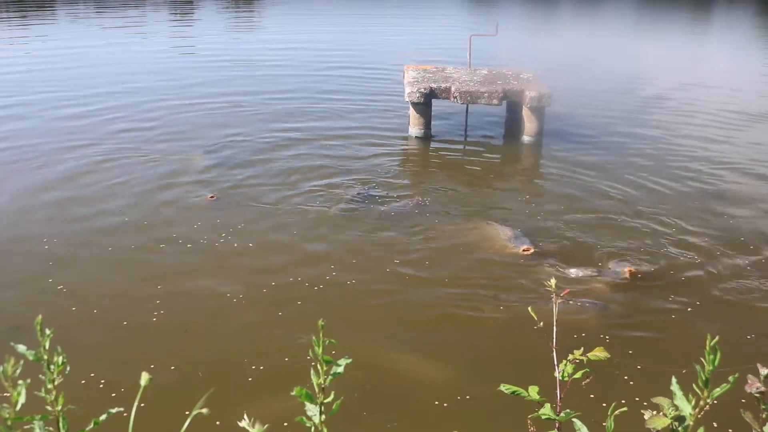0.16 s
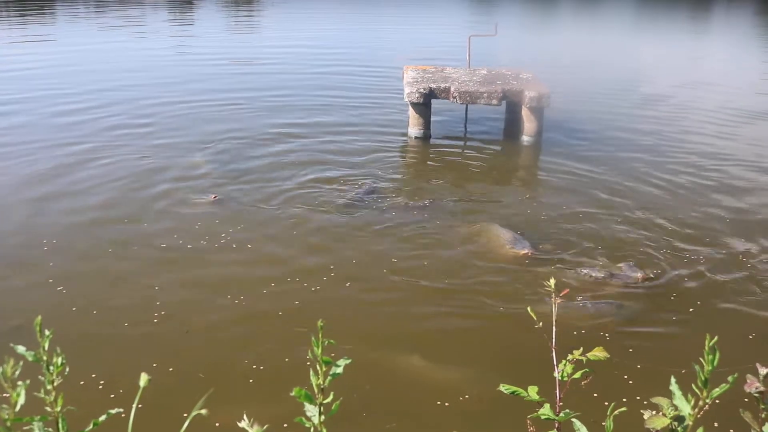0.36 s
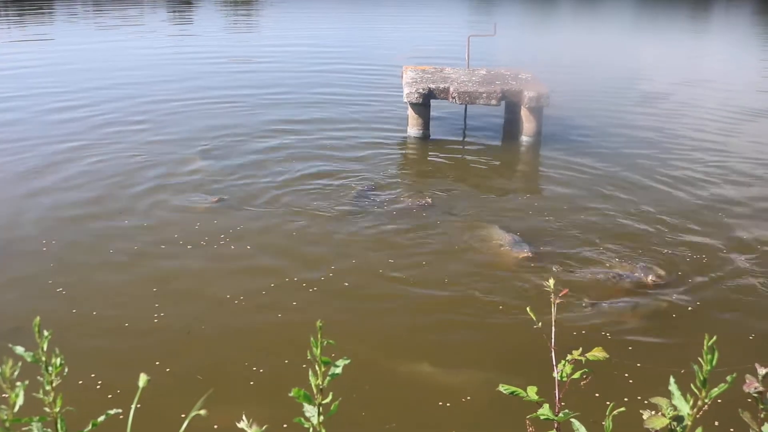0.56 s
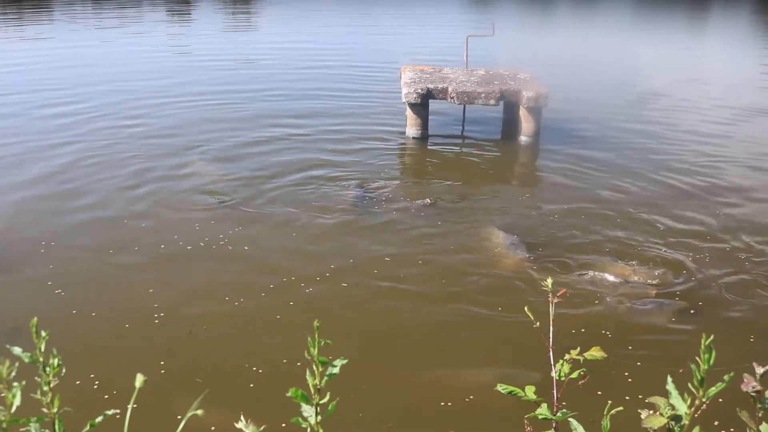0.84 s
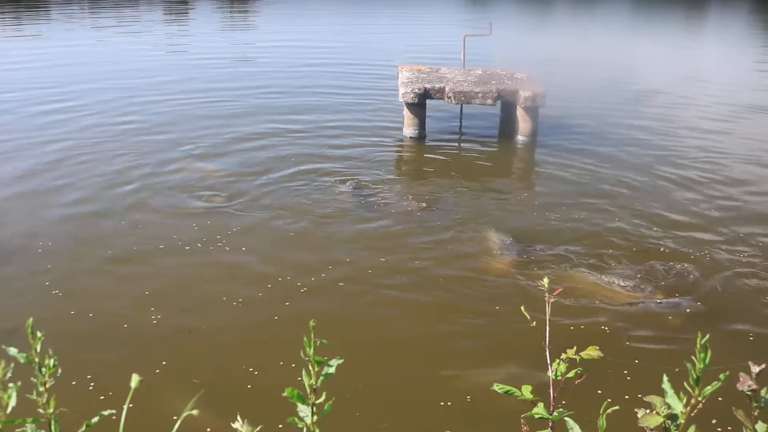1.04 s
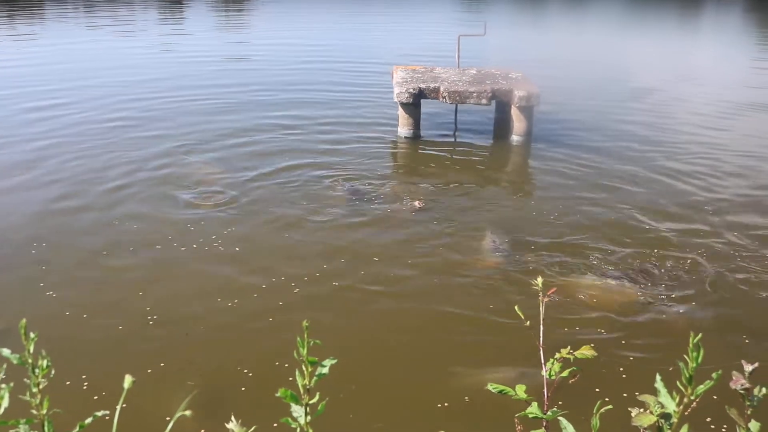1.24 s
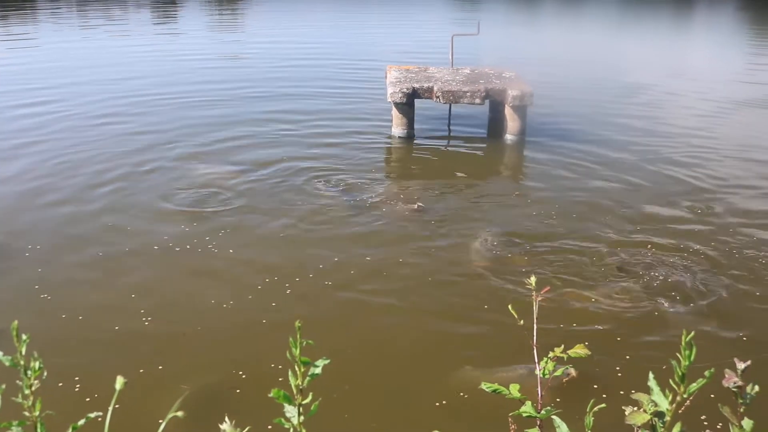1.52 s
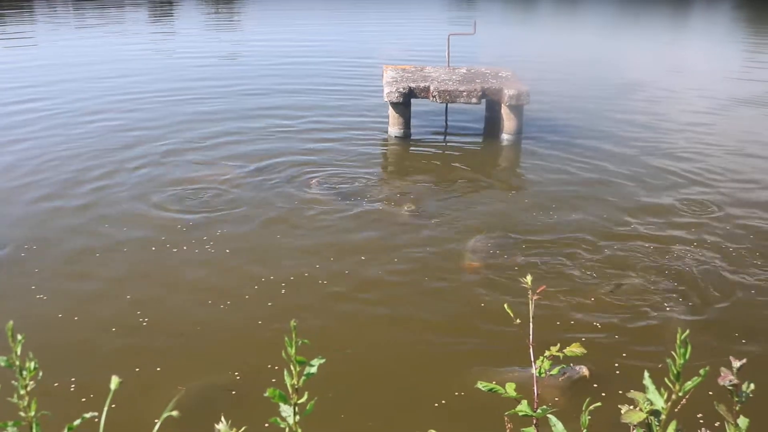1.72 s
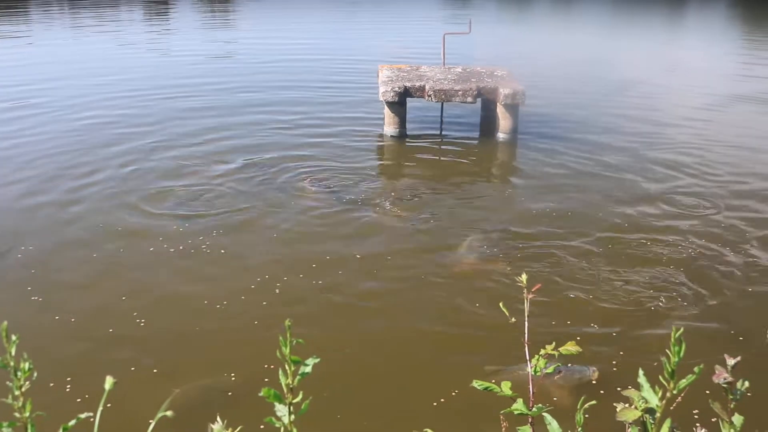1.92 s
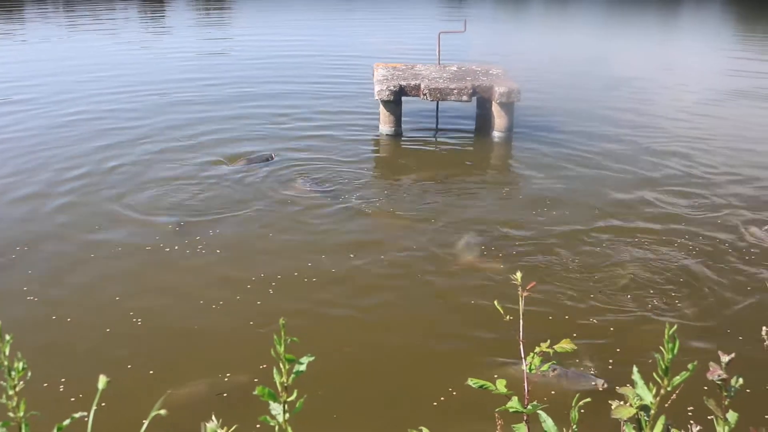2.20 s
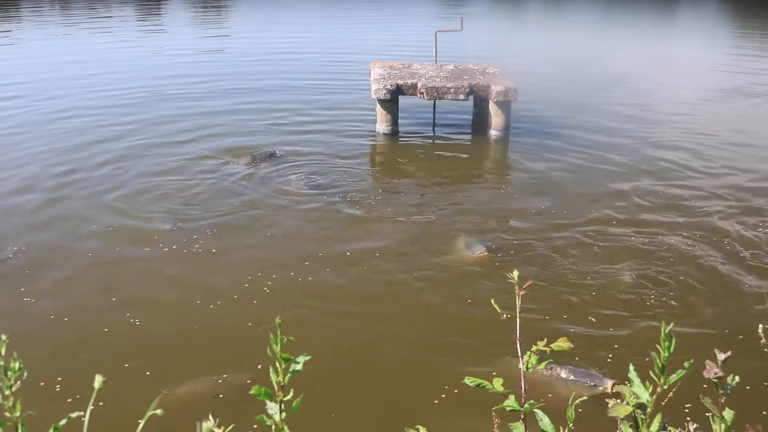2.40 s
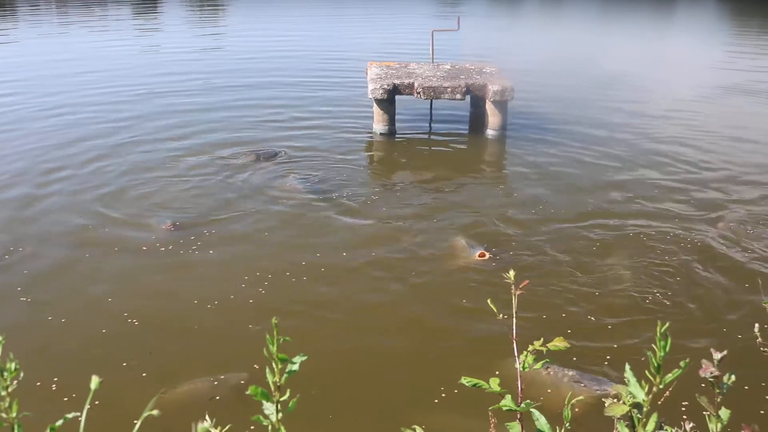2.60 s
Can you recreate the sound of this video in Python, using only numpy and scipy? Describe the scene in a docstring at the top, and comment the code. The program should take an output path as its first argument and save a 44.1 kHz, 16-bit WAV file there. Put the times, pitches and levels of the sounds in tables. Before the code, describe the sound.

Carp feed at a lake surface slightly right, with sharp wet smacks, hollow gulps, bubbles and fizzing water, first in a busy burst, then briefly again later; songbirds whistle, trill and chatter around the stereo microphones outdoors.

```python
"""A thin bird slur over faint outdoor air, and at once carp feeding at a calm lake's surface, a little right.
Their mouths smack and ring with trapped air; bubbles plop or glide upward, churned water fizzes, drops tick.
Songbirds whistle, trill and chatter along the bank as gliding pure tones, with scattered echoes from trees.
Distant notes heard only as echoes, and shaped noise for the air, fill the background at the stereo microphones."""
import sys
import numpy as np
from scipy import signal
from scipy.fft import rfft, irfft
from scipy.io import wavfile

SR = 44100
rng = np.random.default_rng(int(sys.argv[2]) if len(sys.argv) > 2 else 0)


def wav_out(sig):
    """Save sig, one row per channel (or a flat mono array), as 16-bit PCM at SR to the path in sys.argv[1]."""
    wavfile.write(sys.argv[1], SR, np.round(np.clip(np.atleast_2d(sig).T, -1, 1) * 32767).astype(np.int16))


N = 121275  # samples, 2.75 s


def from_db(db):
    """Decibels to an amplitude factor."""
    return 10 ** (np.asarray(db) / 20)


def rms_one(x):
    """Scale to an rms of 1."""
    return x / np.sqrt(np.mean(x ** 2) + 1e-20)


def at_hz(points, hz):
    """Read a curve of (Hz, value) points, straight over log frequency."""
    point_hz, values = np.array(points).T
    return np.interp(np.log(hz), np.log(point_hz), values)


def spectrum_hz():
    """Frequencies of the full-length spectrum, kept off zero."""
    return np.maximum(np.fft.rfftfreq(N, 1 / SR), 1)


def seconds(length):
    """Time axis of an event, at least 8 samples."""
    return np.arange(max(int(length * SR), 8)) / SR


def add(track, s, sound):
    """Mix a sound into the track at a time in seconds."""
    i = max(int(s * SR), 0)
    track[..., i:i + sound.shape[-1]] += sound[..., :max(N - i, 0)]


def drift(rate):
    """Smooth random wander of spread 1, from noise through a double pole; a higher rate wanders faster."""
    step = 40  # samples between computed points
    r = np.exp(-2 * step * np.pi * rate / SR)
    noise = rng.standard_normal(N // step + 2002)
    slow = signal.lfilter([1], [1, -2 * r, r * r], noise)[2000:]
    return np.interp(np.arange(N) / step, np.arange(len(slow)), rms_one(slow))


def during(curve, s, t):
    """The stretch of a long curve that an event covers."""
    return np.take(curve, int(s * SR) + np.arange(len(t)), mode="wrap")


def sine(hz):
    """A tone that follows a changing pitch by summing its phase."""
    return np.sin(2 * np.pi * np.cumsum(hz) / SR)


def swell(u, crest):
    """Rounded rise to a crest and fall, over progress 0-1."""
    return np.sin(np.pi * np.interp(u, [0, np.clip(crest, .05, .95), 1], [0, .5, 1]))


def place(x, pan_db, lag_s):
    """Set a direction by the left-minus-right level and the lag of the left ear."""
    n = np.arange(len(x))
    half_lag = lag_s * SR / 2
    left = np.interp(n - half_lag, n, x) * from_db(pan_db / 2)
    right = np.interp(n + half_lag, n, x) * from_db(-pan_db / 2)
    return np.array([left, right])


def coloured(spectrum):
    """Steady noise with a given spectrum; rms 1."""
    white = rfft(rng.standard_normal(N))
    return rms_one(irfft(white * from_db(at_hz(spectrum, spectrum_hz())), N))


def trees(x, t60=.55):
    """Scattered echoes from the bank as dying noise tails, different at each ear; t60 in seconds."""
    t = seconds(0.96)
    onset = 1 - np.exp(-t / .006)
    tails = rng.standard_normal((2, len(t))) * from_db(-60 * t / t60) * onset
    return np.array([signal.fftconvolve(x, tail / np.linalg.norm(tail))[:len(x)] for tail in tails])


def bubble(hz, t60, rise, attack_s):
    """A pocket of air in water: a dying ring that climbs in pitch."""
    t = seconds(t60 * 2)
    return sine(hz * (1 + rise * t)) * from_db(-60 * t / t60) * (1 - np.exp(-t / attack_s))


# Carp mouths at the surface, a little right of the microphones.
# Each row: start in seconds, smack level in dB before the dulling filters, smack pitch in Hz,
# air pocket level in dB before the same filters.
MOUTH_GULPS = [(0.306, -35.5, 725, -37), (.381, -26, 1080, -33.5), (.399, -28, 960, -32),
               (.407, -24.5, 920, -44), (0.569, -28, 1010, -32.5), (0.606, -22, 1160, -28.5),
               (0.6189, -22.5, 1200, -50), (0.669, -53, 900, -32), (0.702, -39, 990, -29.5),
               (0.7198, -22.5, 880, -29), (0.7252, -16, 1620, -33.5), (0.872, -34, 1920, -36.5),
               (2.161, -42, 800, -25.5), (2.209, -19, 1340, -28.5), (2.2362, -25.5, 1700, -25.5),
               (2.651, -38, 607, -34)]
POCKET_HZ = 242.2  # centre of the random pitches
POCKET_T60_S, POCKET_RISE_PER_S, POCKET_ATTACK_S = 0.061, 6.4, 0.00057
SMACK_DECAY_S, SMACK_SPATTER, SPATTER_DECAY_S, SMACK_TOP_HZ = 0.00058, 0.28, 0.0073, 2260


def gulps():
    """One sharp swing of pressure with a wet spatter, then the low ring of the mouth's air pocket."""
    out, t = np.zeros(N), seconds(.04)
    for s, smack_db, smack_hz, pocket_db in MOUTH_GULPS:
        band = signal.butter(1, [smack_hz / 2, smack_hz * 2], "band", fs=SR, output="sos")
        spatter = rms_one(signal.sosfilt(band, rng.standard_normal(len(t))))
        swing = -2 * np.sin(2 * np.pi * smack_hz * t) * np.exp(-t / SMACK_DECAY_S)
        smack = swing + SMACK_SPATTER * spatter * np.exp(-t / SPATTER_DECAY_S)
        add(out, s, from_db(smack_db) * smack)
        pocket_hz = POCKET_HZ * rng.uniform(0.734, 1.24)
        pocket = bubble(pocket_hz, POCKET_T60_S, POCKET_RISE_PER_S, POCKET_ATTACK_S)
        add(out, s, from_db(pocket_db) * pocket)
    dull_top = signal.butter(4, SMACK_TOP_HZ, fs=SR, output="sos")
    thin_bass = signal.butter(2, POCKET_HZ * 0.62, "high", fs=SR, output="sos")
    return signal.sosfilt(np.vstack([dull_top, thin_bass]), out)


# Small bubbles pinching off among the fish.
# Each row: start in seconds, starting pitch in Hz, relative level in dB.
BUBBLE_PLOPS = [(0.255, 1456, -35.5), (0.407, 2670, -22), (.438, 2890, -17.5), (0.445, 1373, -29),
                (0.53, 1820, -30), (0.583, 1856, -31), (.896, 1540, -32), (0.925, 1940, -31.5),
                (1.279, 967, -31), (2.161, 653, -19.5), (2.261, 793, -27.5)]
PLOP_CYCLES = 60  # starting-pitch cycles for a 60 dB fall
PLOP_RISE_PER_S, PLOP_ATTACK_S = 7.0, 0.00093
# Bubbles that rise in pitch as they near the surface, at the same spot.
# Each row: start in seconds, length in seconds, last pitch in Hz, level in dB before the flutter.
BUBBLE_GLIDES = [(0.467, 0.073, 1610, -43), (0.511, 0.051, 1916, -43), (0.655, 0.053, 1120, -42.5),
                 (0.71, 0.029, 1260, -28), (0.742, 0.051, 1140, -35), (0.837, 0.031, 930, -41.5),
                 (.905, 0.08, 1687, -36), (1.322, 0.07, 2020, -40.5), (1.369, 0.067, 1916, -44.5),
                 (1.389, .115, 2103, -34), (2.018, 0.077, 1440, -40.5), (2.157, 0.053, 1555, -40.5),
                 (2.23, 0.036, 912, -34), (2.702, 0.055, 1280, -45.5)]
GLIDE_FIRST_HZ, GLIDE_BEND, GLIDE_CREST, GLIDE_ROUGH = 454, 1.35, 0.75, 0.22
COMPANION_DB, COMPANION_SPREAD = -12.5, 0.21  # level under the glide, pitch spread as a fraction


def bubbles():
    """Short ringing plops, and longer glides that climb ever faster, each with three faint companions."""
    out, flutter = np.zeros(N), drift(105)
    for s, hz, db in BUBBLE_PLOPS:
        add(out, s, from_db(db) * bubble(hz, PLOP_CYCLES / hz, PLOP_RISE_PER_S, PLOP_ATTACK_S))
    for s, length, last_hz, db in BUBBLE_GLIDES:
        t = seconds(length)
        u = t / length
        rise = GLIDE_FIRST_HZ * (last_hz / GLIDE_FIRST_HZ) ** u ** GLIDE_BEND
        shape = swell(u, GLIDE_CREST)
        roughness = 1 + GLIDE_ROUGH * during(flutter, s, t)
        add(out, s, from_db(db) * sine(rise) * shape * roughness)
        for shift, pitch in rng.uniform(-1, 1, (3, 2)):
            companion = sine(rise * (1 + COMPANION_SPREAD * pitch)) * shape
            companion = companion * (1 + during(flutter, s + length, t) / 2)
            add(out, s + shift * length / 2, from_db(db + COMPANION_DB) * companion)
    return out


# How strongly the water close to the fish is stirred.
# Each row: time in seconds, level in dB.
STIRRING = [(.22, -53.5), (.34, -47), (.4, -39.5), (.48, -43.5), (.65, -42), (.81, -53), (0.941, -46.5),
            (1.05, -51.5), (1.4, -51), (1.6, -60), (2.14, -57), (2.231, -40.5), (2.29, -55.5)]
# Tone of the stirred water. Each row: frequency in Hz, gain in dB.
STIRRED_COLOUR = [(220, -6), (900, -4), (2200, 10.5), (6000, 6), (13000, -9.5)]
CHURN_PER_S, CHURN_CYCLES, CHURN_SPREAD_DB = 1800, 11, 4.5  # mean rate, cycles per 60 dB fall, size spread


def churn():
    """A swarm of tiny ringing bubbles wherever the fish stir the water."""
    loudness = from_db(CHURN_SPREAD_DB * np.minimum(rng.exponential(1, N), 4))
    sizes = loudness * rng.choice([-1, 1], N)
    clicks = sizes * (rng.random(N) < CHURN_PER_S / SR)
    pitches = np.geomspace(230, 13000, 36)
    dealt = rng.integers(0, len(pitches), N)  # each click strikes one pitch
    out = 0
    for k, hz in enumerate(pitches):
        r, w = from_db(-60 * hz / (CHURN_CYCLES * SR)), 2 * np.pi * hz / SR
        struck = clicks * (dealt == k) + 1e-18
        ring = signal.lfilter([0, np.sin(w)], [1, -2 * r * np.cos(w), r * r], struck)
        out = out + from_db(at_hz(STIRRED_COLOUR, hz)) * ring
    return rms_one(out) * from_db(np.interp(np.arange(N) / SR, *np.transpose(STIRRING)))


# Drops of spray landing beside the fish. Each row: start in seconds, level in dB before halving.
SPRAY_DROPS = [(0.274, -27), (0.408, -31), (.455, -25.5), (0.46, -33), (0.639, -35), (.647, -24.5),
               (0.685, -34), (0.924, -31), (0.936, -31.5)]
# Tone of the drops. Each row: frequency in Hz, relative level in dB.
DROP_COLOUR = [(800, 1.5), (3000, 3), (10000, -5), (16000, -3)]
SPRAY_DECAY_S = 0.0044


def spray():
    """Bright ticks of drops hitting the water, as short dying bursts of noise."""
    level, t = np.zeros(N), seconds(.03)
    for s, db in SPRAY_DROPS:
        add(level, s, from_db(db) * np.exp(-t / SPRAY_DECAY_S))
    return level * coloured(DROP_COLOUR) / 2


def note(length, pitches, crest, waver=None, s=0):
    """A pure bird note that arcs through its pitches, smooth in log frequency."""
    t = seconds(length)
    u = t / length
    bend = len(pitches) - 1
    arc = np.polyfit(np.linspace(0, 1, len(pitches)), np.log(pitches), bend)
    hz = np.exp(np.polyval(arc, u))
    return sine(hz * (1 + during(waver, s, t))) * swell(u, crest)


# Birds whistling round the bank, beyond the fish.
# Each row: start in seconds, length in seconds, first, middle and last pitch in Hz,
# level in dB before flutter and mixing, left-minus-right level in dB.
BANK_WHISTLES = [(.262, .052, 2870, 2830, 2330, -34, -13), (.352, .095, 2550, 3550, 2750, -35, -6),
                 (.685, .065, 3200, 2820, 2600, -39, -7), (.778, .1, 2900, 3600, 3080, -35, -8),
                 (.96, .075, 3400, 3000, 3030, -36, 7), (1.01, .2, 3550, 3480, 3600, -39, 0),
                 (1.432, .085, 3200, 2900, 2850, -33, -4), (1.582, .08, 3250, 2880, 3000, -39, -4),
                 (1.71, .053, 3450, 3260, 3200, -36, 7), (2.212, .04, 3650, 3480, 3100, -36, 0),
                 (2.308, .057, 2800, 3420, 3480, -32, 5), (2.35, .085, 4100, 4000, 3950, -35, -3),
                 (2.463, .045, 3600, 3330, 2980, -35, 4), (2.57, .15, 2800, 2600, 2750, -45, 4)]
# Thin high slurs that level off, from trees on the right.
# Each row: start in seconds, length in seconds, first and last pitch in Hz,
# level in dB before flutter and mixing.
THIN_SLURS = [(.065, .065, 3500, 4650, -43), (.235, .035, 5200, 4100, -43), (1.83, .07, 6350, 6800, -45),
              (2.1, .085, 5100, 5600, -41), (2.159, .022, 4450, 3850, -32), (2.226, .06, 7900, 6000, -45),
              (2.282, .07, 5350, 4250, -40), (2.39, .07, 4400, 5400, -47), (2.54, .055, 4650, 5020, -38),
              (2.612, .055, 5900, 3750, -39)]
SLUR_PAN_DB, SLUR_MIDWAY = -6, .68  # SLUR_MIDWAY: share of the sweep done by half time
# A short trill from trees on the right. Each entry: start in seconds.
TRILL_STARTS = [1.08, 1.125, 1.171, 1.215]
TRILL_NOTE_S, TRILL_FIRST_HZ, TRILL_LAST_HZ, TRILL_PAN_DB = .045, 2860, 2720, -10
TRILL_DB = -35  # before flutter and mixing
WHISTLE_WAVER, WHISTLE_FLUTTER, WHISTLE_CREST = .009, .25, .45  # pitch spread, level spread, crest 0-1
WHISTLE_DIRECT_DB, WHISTLE_ECHO_DB, BIRD_LAG_S_PER_DB = -3.5, -12, -.000008


def whistlers():
    """Gliding pure whistles round the bank and a trill on the right, with echoes from the trees."""
    out, waver = np.zeros((2, N)), WHISTLE_WAVER * drift(107)
    calls = [(s, length, (first, middle, last), db, pan)
             for s, length, first, middle, last, db, pan in BANK_WHISTLES]
    calls += [(s, length, (first, first + SLUR_MIDWAY * (last - first), last), db, SLUR_PAN_DB)
              for s, length, first, last, db in THIN_SLURS]
    calls += [(s, TRILL_NOTE_S, (TRILL_FIRST_HZ, TRILL_LAST_HZ), TRILL_DB, TRILL_PAN_DB)
              for s in TRILL_STARTS]
    for s, length, pitches, db, pan_db in calls:
        call = from_db(db) * note(length, pitches, WHISTLE_CREST, waver, s)
        add(out, s, place(call, pan_db, BIRD_LAG_S_PER_DB * pan_db))
    out = out * (1 + WHISTLE_FLUTTER * drift(74))
    echoes = (trees(out[0]) + trees(out[1])) / np.sqrt(2)
    return from_db(WHISTLE_DIRECT_DB) * out + from_db(WHISTLE_ECHO_DB) * echoes


# A chattering bird in the trees on the left. Each entry: start of a syllable in seconds.
CHATTER_STARTS = [1.454, 1.608, 1.757, 1.904, 2.056]
STROKE_S, STROKE_GAP_S, STROKE_TOP_HZ, STROKE_END_HZ, STROKE_DB = 0.01277, .0125, 5230, 3490, -38.5
# Its falling slur. Each entry: pitch in Hz at the start, middle and end.
CHATTER_SLUR_HZ = (3937, 2633, 2464)
SLUR_S, SLUR_DB, CHATTER_BUZZ = .066, -38.5, .05  # CHATTER_BUZZ: pitch spread as a fraction
CHATTER_PAN_DB, CHATTER_LAG_S, CHATTER_T60_S, CHATTER_ECHO_DB = 10, -0.00019, 0.2, -1


def chatterer():
    """Three steep, buzzy downstrokes and a slur in each syllable, blurred by the trees on the left."""
    out, buzz = np.zeros(N), CHATTER_BUZZ * drift(590)
    for s in CHATTER_STARTS:
        for k in range(3):
            start = s + k * STROKE_GAP_S
            stroke = note(STROKE_S, (STROKE_TOP_HZ, STROKE_END_HZ), 0.31, buzz, start)
            add(out, start, from_db(STROKE_DB) * stroke)
        slur = note(SLUR_S, CHATTER_SLUR_HZ, 0.05, buzz, s)
        add(out, s + 2.5 * STROKE_GAP_S, from_db(SLUR_DB) * slur)
    echoes = trees(out, CHATTER_T60_S)
    return place(out, CHATTER_PAN_DB, CHATTER_LAG_S) + from_db(CHATTER_ECHO_DB) * echoes


# Loudness of far birds by pitch. Each row: frequency in Hz, relative level in dB.
FAR_BIRD_COLOUR = [(2000, -16), (2750, 0.5), (4700, -0.5), (6000, -15)]
FAR_BIRDS_DB = -48.5
FAR_NOTE_S, FAR_LOW_HZ, FAR_HIGH_HZ, FAR_SWEEP = .07, 2550, 5300, .12  # FAR_SWEEP: in log pitch


def far_birds(count=130):
    """Many distant arching notes, heard only as echoes among the trees."""
    out, waver = np.zeros(N), WHISTLE_WAVER * drift(141)
    for k, (pitch, *arc) in enumerate(rng.random((count, 4))):
        s = k * N / SR / count
        hz = FAR_LOW_HZ * (FAR_HIGH_HZ / FAR_LOW_HZ) ** pitch
        pitches = hz * np.exp(FAR_SWEEP * (2 * np.array(arc) - 1))
        call = note(FAR_NOTE_S, pitches, WHISTLE_CREST, waver, s)
        add(out, s, from_db(at_hz(FAR_BIRD_COLOUR, hz)) * call)
    echoes = trees(np.tile(out, 2))[:, N:]  # second pass, with echoes already under way
    return from_db(FAR_BIRDS_DB) * rms_one(echoes)


# Open air round the microphones. Each row: frequency in Hz, relative level in dB per Hz.
AIR_COLOUR = [(25, -23.5), (45, -14.5), (80, 2), (140, -5), (700, -12), (2000, -17.5), (9500, -21.5),
              (15500, -28)]
# How alike the air is at both ears. Each row: frequency in Hz, left-right likeness from -1 to 1.
AIR_LIKENESS = [(200, 0.51), (3000, 0.02)]
AIR_DB = -53.5


def air():
    """Faint rumble and hiss: shaped noise, more alike at both ears in the bass."""
    alike = np.clip(at_hz(AIR_LIKENESS, spectrum_hz()), -1, 1)
    mid = rfft(coloured(AIR_COLOUR)) * np.sqrt(1 + alike)
    side = rfft(coloured(AIR_COLOUR)) * np.sqrt(1 - alike)
    return from_db(AIR_DB) * rms_one(irfft([mid + side, mid - side], N))


WATER_PAN_DB, WATER_LAG_S, WATER_ECHO_DB = -2.5, 0.00011, -19


def scene():
    """The feeding fish a little right, birds and air all round."""
    water = gulps() + bubbles() + churn() + spray()
    lake = place(water, WATER_PAN_DB, WATER_LAG_S) + from_db(WATER_ECHO_DB) * trees(water)
    return lake + whistlers() + chatterer() + far_birds() + air()


def record(dry):
    """The top is cut steeply above 15.8 kHz."""
    steep = signal.ellip(12, .1, 80, 15800, fs=SR, output="sos")
    return signal.sosfilt(steep, dry)


dry = scene()
out = record(dry)
wav_out(out)
```